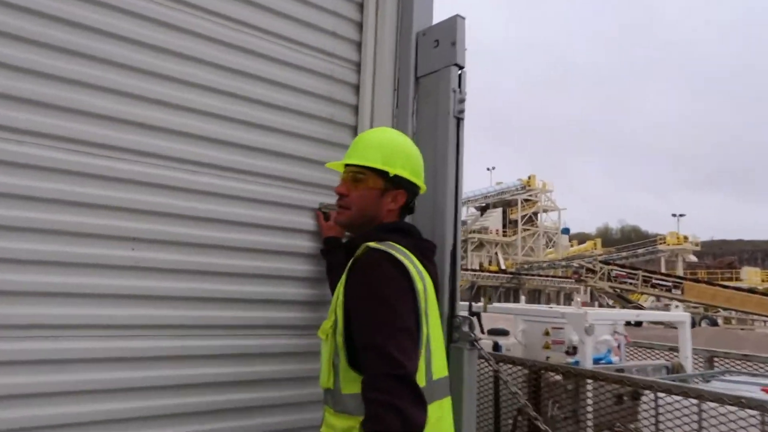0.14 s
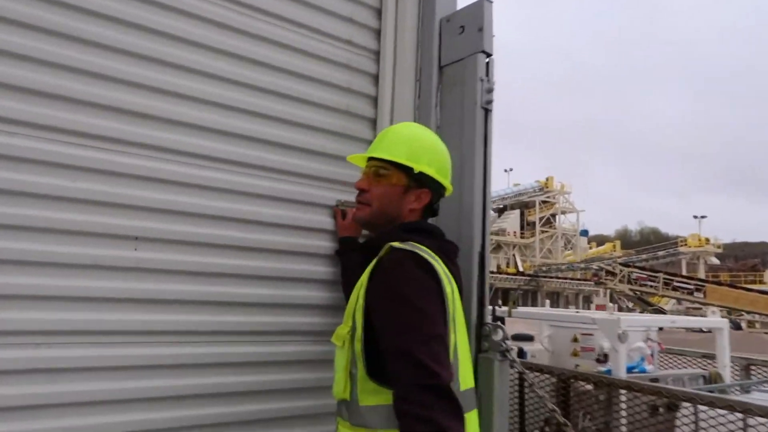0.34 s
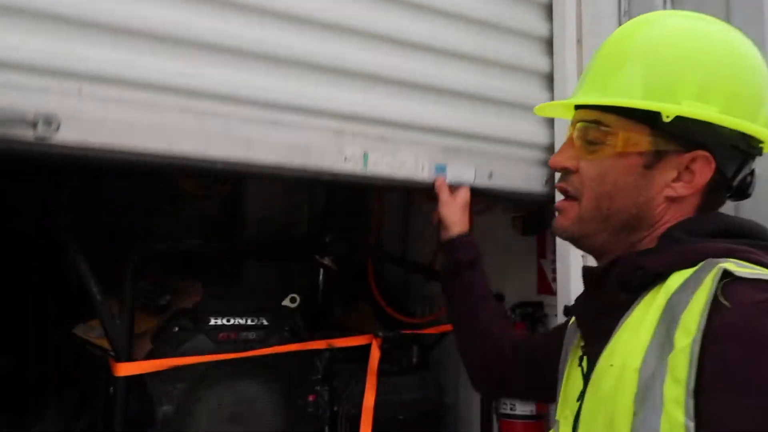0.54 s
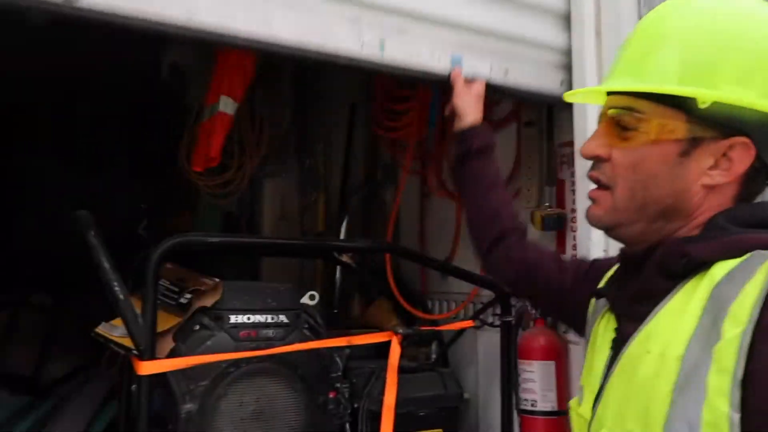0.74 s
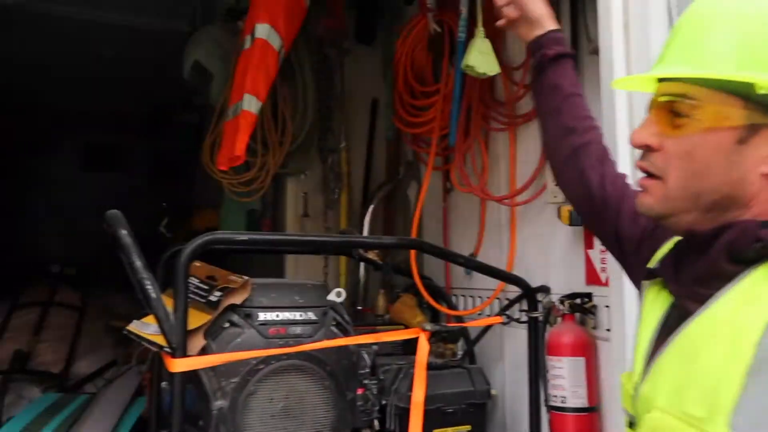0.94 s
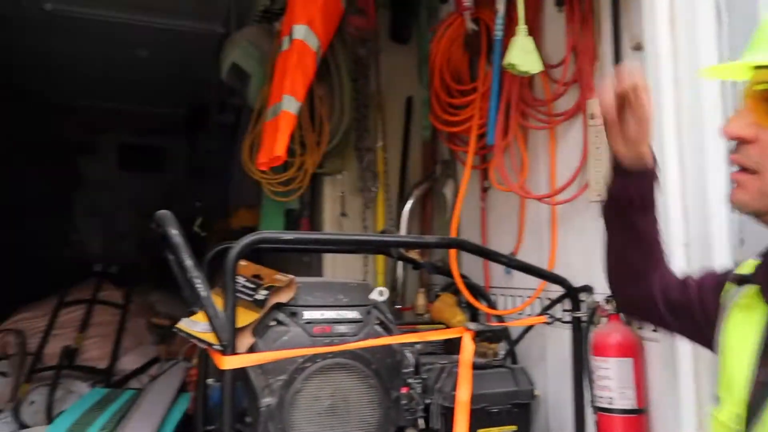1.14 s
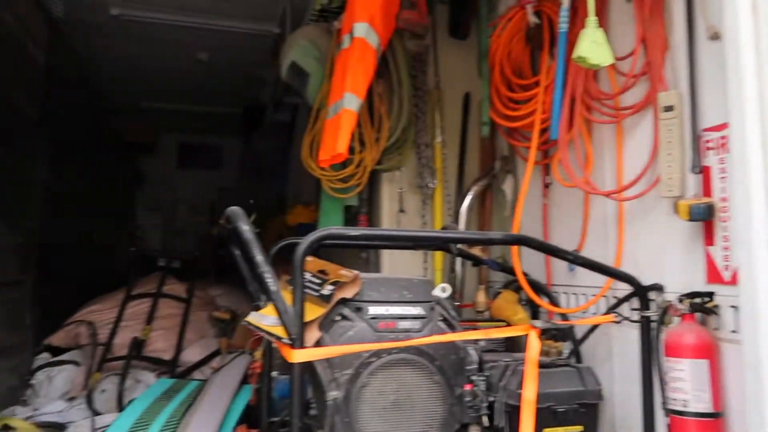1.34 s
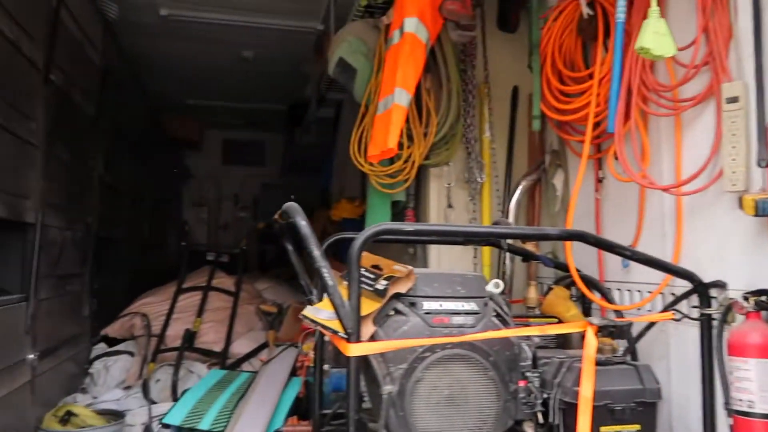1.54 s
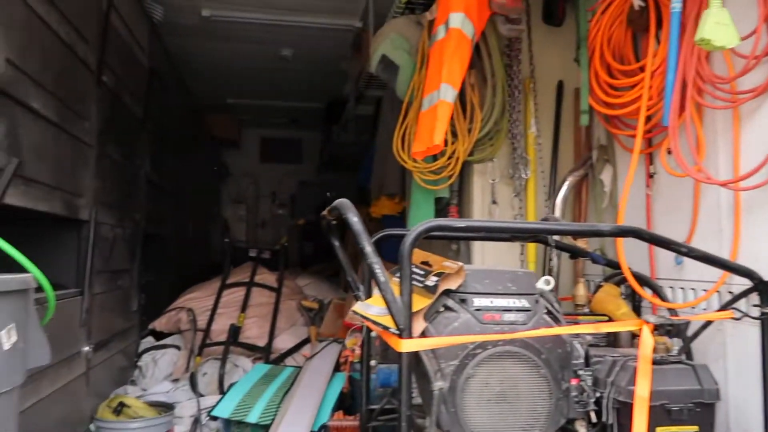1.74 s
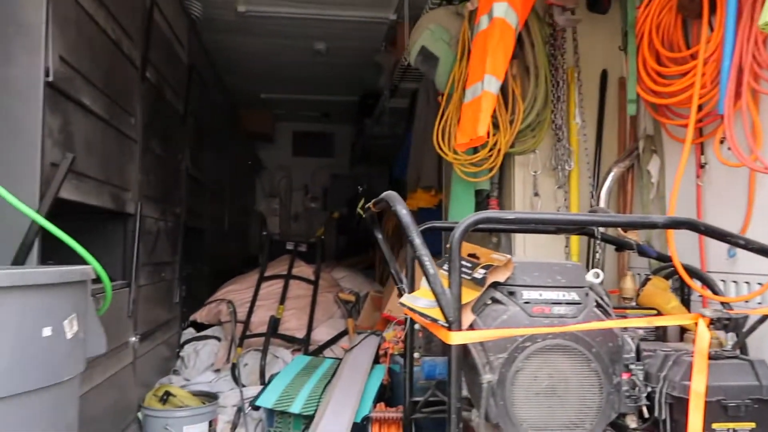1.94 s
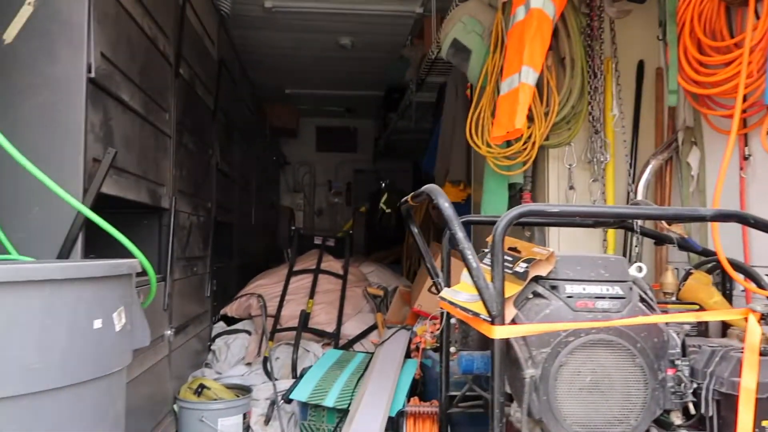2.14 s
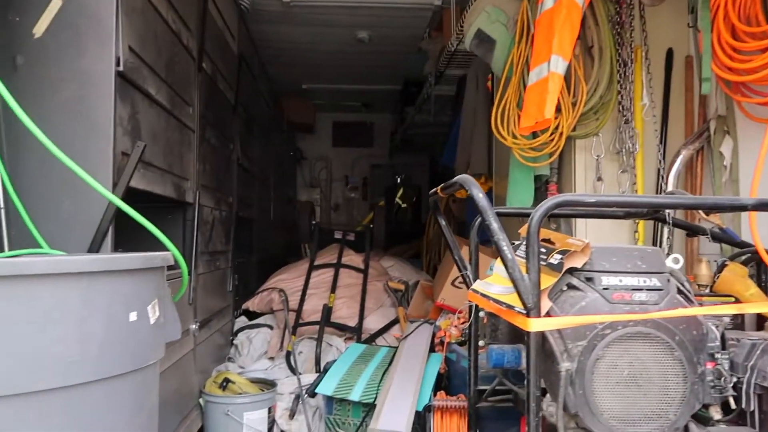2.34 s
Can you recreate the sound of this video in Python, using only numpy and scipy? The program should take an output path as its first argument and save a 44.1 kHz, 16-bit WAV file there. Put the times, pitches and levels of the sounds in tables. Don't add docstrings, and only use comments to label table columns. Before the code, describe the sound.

Sheet-metal trailer door shoved up close by, rumbling and clanking in its tracks over faint yard drone.

```python
import sys
import numpy as np
from scipy import signal
from scipy.fft import rfft, irfft, next_fast_len
from scipy.io import wavfile
from scipy.ndimage import map_coordinates

SR = 44100
rng = np.random.default_rng(int(sys.argv[2]) if len(sys.argv) > 2 else 0)


def unload_wav(signal):
    wavfile.write(
        sys.argv[1],
        SR,
        np.round(np.clip(np.atleast_2d(signal).T, -1, 1) * 32767).astype(np.int16),
    )


def invert_db(x):
    u = np.asarray(x, float) / 20
    return 10 ** u


N = 109412


def unit(x):
    return x / np.sqrt(np.mean(x ** 2) + 1e-20)


def along(points, hz):
    f, v = np.transpose(points)
    return np.interp(np.log(hz + 1), np.log(f + 1), v)


def filtered(x, response):
    m = next_fast_len(len(x) + 8192)
    return irfft(rfft(x, m) * response(np.fft.rfftfreq(m, 1 / SR)), m)[:len(x)]


def coloured(x, points):
    return unit(filtered(x, lambda hz: invert_db(along(points, hz))))


def wobble(rate):
    knots = rng.standard_normal(int(N * 60 / SR) + 4)
    return map_coordinates(knots, [np.arange(N) * min(rate, 60) / SR])


def grit(per_s, spread_db, noise):
    hit = rng.random(N) < per_s / SR
    size = invert_db(spread_db * np.minimum(rng.exponential(size=N), 2))
    contacts = hit * rng.standard_normal(N) * size
    return unit(contacts) + noise * rng.standard_normal(N)


def clatter(count, low_hz, high_hz, t60, spread_db, noise):
    start, pitch, size = rng.random((count, 3)).T[:, :, None]
    k = np.arange(SR // 32)
    hz = low_hz * (high_hz / low_hz) ** pitch
    size = np.sqrt(hz) * invert_db(spread_db * np.minimum(-np.log(size + 1e-9), 3))
    fade = invert_db(-60 * k / SR / t60) * np.cos(np.pi / 2 * k / len(k))
    rings = size * np.sin(2 * np.pi * hz * k / SR) * fade
    places = (start * N).astype(int) + k
    return unit(np.bincount(places.ravel(), rings.ravel(), N + len(k))[:N]) + noise * rng.standard_normal(N)


# f/Hz, width/Hz, level/dB
PANEL_MODES = [(117, 85, -6), (207.5, 29.5, 0), (298.3, 58, -2.5), (431.5, 28, -10), (549, 26, -5),
               (717, 88, -9), (850, 113, -13), (1129, 51, -8)]


def panel(x, modes=PANEL_MODES):
    def response(f):
        total = 0
        for k, (centre, width, db) in enumerate(modes):
            resonance = 1j * f * width / (centre ** 2 - f ** 2 + 1j * f * width)
            total = total + (-1) ** k * invert_db(db) * resonance
        return total / (1 + 1j * f / 3500)
    return unit(filtered(x, response))


# f/Hz, level/dB per Hz
SHEET_BODY = [(35, -49), (60, -7.5), (216, -6), (263, -2), (373, -5), (715, -1), (780, -4), (4000, -33),
              (5200, -21.5), (8800, -120)]
# f/Hz, width/Hz, level/dB
LOW_DOOR_MODES = [(419, 16, -1), (710, 72, -4)]


def rumble():
    t = np.arange(N) / SR
    bumps_per_s = 900
    resonant = panel(grit(bumps_per_s, spread_db=3.5, noise=1.03))
    contacts = clatter(count=1500, low_hz=82.06, high_hz=4418, t60=0.27, spread_db=3.0, noise=0.51)
    sheet = coloured(contacts, SHEET_BODY)
    low_door = panel(grit(bumps_per_s, spread_db=3.5, noise=0.92), LOW_DOOR_MODES)
    return invert_db(-4.5) * resonant + invert_db(-4) * sheet + invert_db(2 - 22 * t) * low_door


# f/Hz, level/dB per Hz
RATTLE_SPECTRUM = [(900, -4.5), (1500, 0), (3400, -12.5), (6000, -16), (9300, -30), (13000, -31),
                   (15600, -49), (16500, -120)]


def rattle():
    t = np.arange(N) / SR
    near_from_s, near_to_s = 0.21, 1.15
    rings = clatter(count=3500, low_hz=1500, high_hz=15500, t60=0.03, spread_db=2.5, noise=0.7)
    bright = coloured(rings + grit(1500, 6, noise=0), RATTLE_SPECTRUM)
    dull = filtered(bright, lambda f: 1 / (1 + (f / 7000) ** 3))
    near = np.clip(np.minimum(t - near_from_s, near_to_s - t) * 20, 0, 1)
    return near * bright + (1 - near) * dull


# t/s, rolling level/dB, rattle over rolling/dB
PUSH = [(0.0, -23, -11.5), (0.072, -28, -20.5), (0.206, -35.5, -53), (0.242, -30.5, -39),
        (0.292, -30, -16.5), (0.364, -24, -24.5), (0.396, -23.5, -16.5), (0.54, -19.5, -12.5),
        (0.854, -23, -10.5), (1.01, -19, -17.5), (1.106, -28, -10), (1.141, -19.5, -13),
        (1.229, -28.5, -13.5), (1.267, -18.5, -10.5), (1.288, -20.5, -12), (1.688, -26.5, -19),
        (1.74, -39.5, -18), (1.85, -51, -40)]


def rolling():
    t = np.arange(N) / SR
    s, roll_points, rattle_points = np.transpose(PUSH)
    roll_db, rattle_db = np.interp(t, s, roll_points), np.interp(t, s, rattle_points)
    moving = invert_db(roll_db + 1.35 * wobble(24.74)) * (t < s[-1])
    rattle_gain = invert_db(5.5 + rattle_db + 2.3 * wobble(40.18))
    return moving * (invert_db(1) * rumble() + rattle_gain * rattle())


# f/Hz, level/dB per Hz
YARD_SPECTRUM = [(15, -28), (25, -17), (75, -2), (274, -15), (327, -13.5), (668, -21), (2330, -27.5),
                 (11000, -72.5), (14300, -102), (22000, -120)]
# f/Hz, level/dB
ENGINE_LINES = [(37, -38), (64.5, -43.5), (116, -46)]


def yard():
    t = np.arange(N) / SR
    gain_low_s, creep_db_per_s, early_db_per_s = 2.04, 10.5, 6
    since_low = t - gain_low_s
    gain_db = np.where(since_low > 0, creep_db_per_s * since_low, -early_db_per_s * since_low)
    drone = invert_db(-38 + 1.7 * wobble(11)) * coloured(rng.standard_normal(N), YARD_SPECTRUM)
    lines = 0
    for k, (hz, db) in enumerate(ENGINE_LINES):
        level = invert_db(db + 6 * wobble(9 + k))
        pitch = hz * (1 + 0.0398 * wobble(6 + k))
        lines = lines + level * np.sin(2 * np.pi * np.cumsum(pitch) / SR)
    return invert_db(gain_db) * drone + invert_db(np.maximum(creep_db_per_s * since_low, 0)) * lines


def whine():
    return invert_db(-86 + 4.3 * wobble(30.0)) * np.sin(2 * np.pi * 13006 * np.arange(N) / SR)


def port_hiss():
    spectrum = [(2000, -19), (5000, -1.5), (11000, -18), (14500, -20)]  # f/Hz, level/dB per Hz
    return [invert_db(-67.5) * coloured(rng.standard_normal(N), spectrum) for port in range(2)]


# t/s, peak level/dB, treble over it/dB, boom over it/dB, t60/s
HINGE_BLOWS = [(0.048, -19, -39, -15, 0.14), (0.314, -19, -13, 6.5, 0.096), (0.386, -5, -18, 1, 0.22),
               (0.395, -11.5, -5.5, 0, 0.16), (0.415, -17, -1.5, -21, 0.079), (0.437, -12, -16, 0, 0.14),
               (0.452, -21, 1, -14, 0.21), (0.499, -8.5, -16, 2, 0.13), (0.515, -3.5, -17, -1.5, 0.2),
               (0.569, -31, -22, 7, 0.27), (0.595, -12.5, -4, 5, 0.059), (0.602, -9, -15.5, 3, 0.25),
               (0.626, -10, -7.5, -15, 0.17), (0.721, -7.5, -10, -2, 0.15), (0.787, -13.5, -49, -13, 0.23),
               (0.824, -12, -38, -27, 0.16), (0.847, -11.5, -17, -32, 0.4), (0.899, -12.5, -23, 6, 0.16),
               (0.913, -14.5, -7, 1, 0.092), (0.963, -10.5, -17.5, 3, 0.23), (0.986, -8.5, -18.5, 3, 0.21),
               (1.019, -16, -8, -18, 0.084), (1.136, -14.5, -22, 4, 0.68), (1.256, -4.5, -22, -18, 0.2)]
LATE_BLOWS = [(1.36, -10, -17, -23, 0.32), (1.379, -9.5, -16.5, -0.5, 0.29), (1.416, -13.5, -33, -8, 0.29),
              (1.434, -16, -43, -6, 0.18), (1.508, -14.5, -31, -14, 0.2), (1.562, -11.5, -45, -11, 0.11),
              (1.654, -14.5, -17, 6.5, 0.15), (2.075, -35.5, -40, 16, 0.072),
              (2.4205, -11.5, -12, -2, 0.33), (2.465, -14, -13, -10, 0.21), (2.47, -4.5, -16.5, -18, 0.23),
              (0.712, -17.5, -1.5, -3, 0.11), (0.507, -15.5, -6, -18, 0.15), (1.13, -30, -8, -6, 0.19),
              (1.7, -40, -40, 14.5, 0.53)]
# f/Hz, level/dB per Hz
CLACK_SPECTRUM = [(240, -26), (400, -16.5), (1000, 1), (1590, -2), (2400, -7), (3100, -39), (4500, -19),
                  (7000, -36)]
# f/Hz, level/dB per Hz
TICK_SPECTRUM = [(1500, -12), (2500, 0.5), (4000, -8), (7000, -14), (10500, -22.5), (12000, -15),
                 (15500, -45), (16500, -120)]
# f/Hz, level/dB, t60/s
HINGE_MODES = [(863, 13, 0.092), (1040, -2, 0.43), (1071, 5, 0.12), (1194, -7, 0.11), (1200, -1, 0.41),
               (1610, 13, 0.078)]


def blow_ring(t, t60):
    hz = 600 * 7.5 ** rng.random((40, 1))
    size = invert_db(along(CLACK_SPECTRUM, hz)) * np.sqrt(hz) * invert_db(rng.normal(0, 6.7, hz.shape))
    sheet = unit((size * np.sin(2 * np.pi * hz * t)).sum(0))
    ring = sheet * invert_db(-60 * t / t60) * (1 - np.exp(-t / 0.0008))
    for f, level, fade in HINGE_MODES:
        tone = invert_db(level + rng.normal(0, 0.9) - 60 * t / fade) * np.sin(2 * np.pi * f * t)
        ring = ring + invert_db(-8) * tone
    return ring


def clacks():
    t = np.arange(SR // 2) / SR
    out = np.zeros(N + SR)
    chatter = coloured(grit(3200, 19.0, noise=5.1), CLACK_SPECTRUM)
    contacts = clatter(count=3000, low_hz=2461, high_hz=15470, t60=0.17, spread_db=-4.5, noise=1.0)
    ticks = coloured(contacts, TICK_SPECTRUM)
    dull_ticks = unit(filtered(ticks, lambda f: 1 / (1 + 1j * f / 5000)))
    boom = panel(grit(700, 2.8, noise=1.18))
    overhead_s, back_s = 0.73, 2.3

    def piece(x, i):
        return np.pad(x, (0, SR))[i:i + len(t)]

    def fall(t60):
        return (1 - np.exp(-t / 0.0027)) * invert_db(-60 * t / t60)

    for s, db, treble_db, boom_db, t60 in list(HINGE_BLOWS) + list(LATE_BLOWS):
        i = round(s * SR)
        tick = piece(dull_ticks if overhead_s < s < back_s else ticks, i)
        crack = invert_db(-60 * t / 0.007)
        blow = 0.36 * blow_ring(t, t60) + 0.45 * piece(chatter, i) * fall(t60 * 0.92)
        blow += invert_db(treble_db + 5.5) * tick * (fall(t60 * 0.71) + crack)
        blow += invert_db(boom_db) * piece(boom, i) * fall(t60 * 0.92)
        out[i:i + len(t)] += invert_db(db - 9.0) * blow
    return out[:N]


# t/s, peak level/dB, f/Hz, decay/cycles
ROLLER_THUMPS = [(0.127, -18.5, 656, 3.4), (0.216, -31, 700, 4.3), (0.239, -18.5, 681, 9.5),
                 (0.353, -17, 650, 7.9), (0.4375, -21, 396, 0.5), (0.483, -12, 890, 2.8),
                 (0.506, -7.5, 650, 2.2), (0.528, -8.5, 780, 3.2), (0.570, -3, 308, 0.93),
                 (0.6025, -2.5, 316, 0.8), (0.7225, -7, 1500, 1.7), (0.848, -13, 490, 0.77),
                 (1.003, -16, 426, 1.6), (1.017, -16, 505, 3.6), (1.11, -19.5, 690, 3.6),
                 (1.137, -5.5, 800, 0.82), (1.396, -7, 665, 0.5), (1.417, -11, 410, 1.2),
                 (1.655, -17, 1120, 5.6), (1.256, -13, 1090, 1.7), (0.664, -15.5, 544, 6.8),
                 (0.083, -12.5, 606, 2.4), (0.315, -12.5, 484, 1.2), (2.078, -33, 390, 3.7),
                 (2.115, -34, 510, 3.4), (2.4255, -6.5, 556, 0.55), (2.475, -28, 1170, 1)]


def thumps():
    t, out = np.arange(SR // 16) / SR, np.zeros(N + SR)
    for s, db, hz, cycles in ROLLER_THUMPS:
        envelope = np.exp(-t * hz / cycles) * (1 - np.exp(-t * hz * 12))
        out[round(s * SR):][:len(t)] += invert_db(db) * envelope * np.sin(2 * np.pi * hz * t)
    return out[:N]


# t/s, peak level/dB, t60/s
PIN_SNAPS = [(0.2354, -45, .04), (0.400, -9, .02), (0.418, -22, .04), (0.519, -11, 0.027),
             (0.624, -11, 0.023), (0.722, -13.5, 0.029), (0.8195, -45, 0.024), (0.9862, -27, .03),
             (1.2371, -34, 0.034), (1.262, -30, 0.021), (1.554, -35, 0.026), (1.6501, -35, 0.023),
             (0.962, -37, 0.034), (1.376, -32, 0.029), (2.084, -51, .03), (2.39, -41, .01)]
# f/Hz, level/dB per Hz
SNAP_SPECTRUM = [(2000, -18), (3500, 5), (7000, -1), (11500, -0.5), (14500, -15), (15700, -30)]


def snaps():
    t, out = np.arange(SR // 16) / SR, np.zeros(N + SR)
    fizz = coloured(rng.standard_normal(N + SR), SNAP_SPECTRUM)
    for s, db, t60 in PIN_SNAPS:
        i = round(s * SR)
        envelope = invert_db(db - 10 - 60 * t / t60) * (1 - np.exp(-t / 0.00047))
        out[i:i + len(t)] += envelope * fizz[i:i + len(t)]
    return out[:N]


# f/Hz, level/dB per Hz
SCRAPE_SPECTRUM = [(2350, -34), (4000, -0.5), (6250, -13), (6770, -15), (11900, -9), (15500, -27)]


def scrape():
    t = np.arange(N) / SR
    start_s, length_s, edge_s = 0.245, 0.14, 0.025
    fade_in = np.clip((t - start_s) / edge_s, 0, 1)
    fade_out = np.clip((start_s + length_s - t) / edge_s, 0, 1)
    return invert_db(-46.5) * fade_in * fade_out * coloured(grit(2600, 2.3, noise=1.0), SCRAPE_SPECTRUM)


# middle t/s, level/dB, length/s
HUM_SWELLS = [(0.386, -32.5, 0.043), (0.492, -21, 0.057), (0.578, -21, 0.052), (0.765, -24.5, 0.034),
              (0.861, -25, 0.051), (0.974, -27, 0.047), (1.132, -24, 0.076), (1.24, -21, 0.062),
              (1.293, -23.5, 0.051), (1.399, -18, 0.063), (1.356, -35.5, .05), (1.558, -29, 0.043),
              (1.493, -27, 0.062), (1.612, -26, 0.05), (1.70, -28, 0.053)]


def box_hum():
    t = np.arange(N) / SR
    strength = invert_db(2.0 * wobble(26.66))
    pitch = 260.4 + 4 * wobble(34.97)
    hum = unit(strength * np.sin(2 * np.pi * np.cumsum(pitch) / SR))
    swells = sum(invert_db(db) * np.exp(-((t - at) / length * 2) ** 2) for at, db, length in HUM_SWELLS)
    return swells * hum


# f/Hz, side under mid level/dB
PORT_WIDTH = [(60, -46), (150, -42.5), (380, -30), (950, -19.5), (2400, -11.5), (6000, -3), (15000, 3)]


def ports(mid):
    z = signal.stft(mid, nperseg=256)[2]
    scattered = signal.istft(z * np.exp(2j * np.pi * rng.random(z.shape)), nperseg=256)[1][:N]
    scattered = unit(scattered) * np.std(mid)
    lead_share = 0.4

    def lead(hz):
        return invert_db(along(PORT_WIDTH, hz)) * lead_share * (1j + 0.45 / (1 + (hz / 4000) ** 2))

    def scatter(hz):
        return invert_db(along(PORT_WIDTH, hz)) * np.sqrt(1 - lead_share ** 2)

    side = filtered(mid, lead) + filtered(scattered, scatter)
    return np.array([mid + side, mid - side])


def scene():
    door = rolling() + clacks() + thumps() + snaps() + scrape() + box_hum()
    return ports(door + yard()) + whine() + port_hiss()


def top_cut(x):
    return signal.sosfilt(signal.butter(12, 15700, fs=SR, output="sos"), x)


def record(dry):
    soft = dry / (1 + np.abs(dry / 1.05) ** 4) ** 0.25

    def band(f):
        return (1j * f / (33 + 1j * f)) ** 2 * (f < 15700)

    mix = np.array([filtered(x, band) for x in soft])
    return top_cut(mix)


dry = scene()
out = record(dry)
unload_wav(out)
```